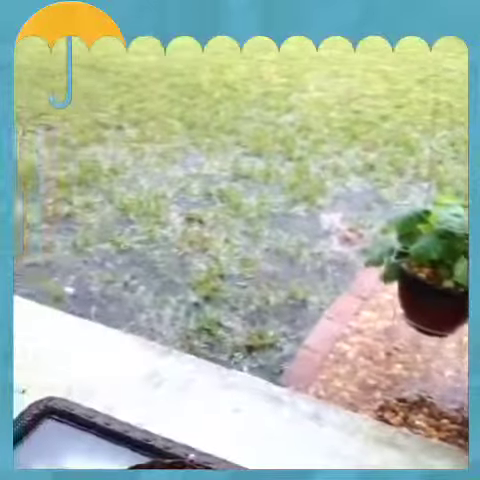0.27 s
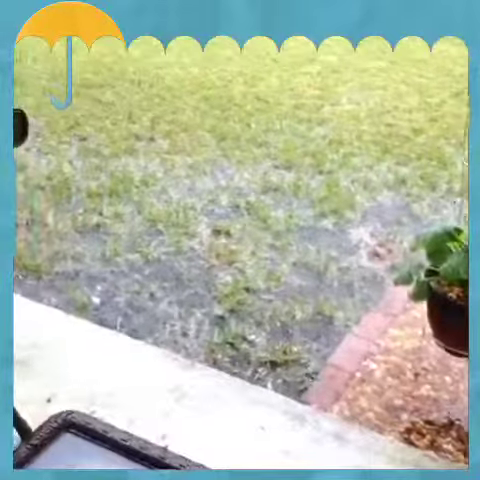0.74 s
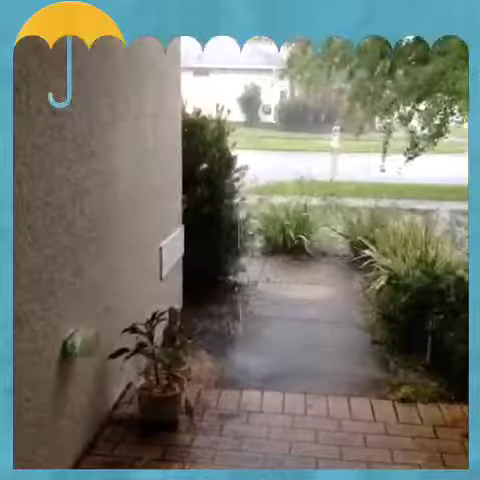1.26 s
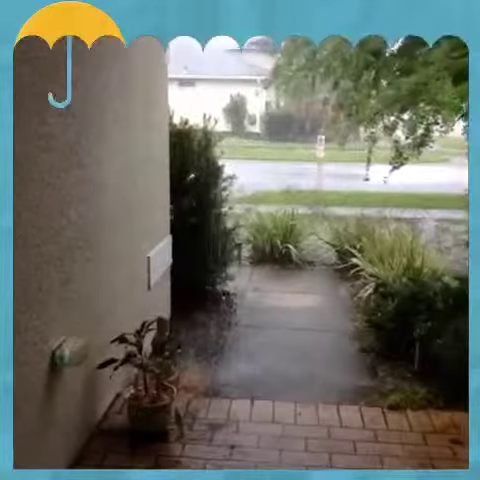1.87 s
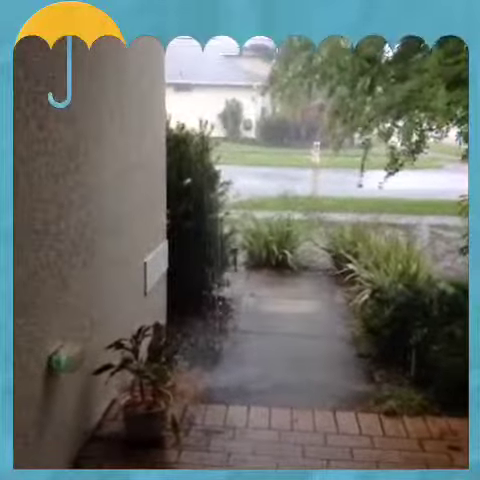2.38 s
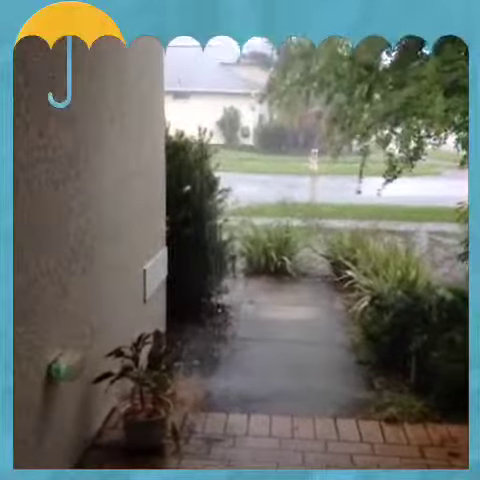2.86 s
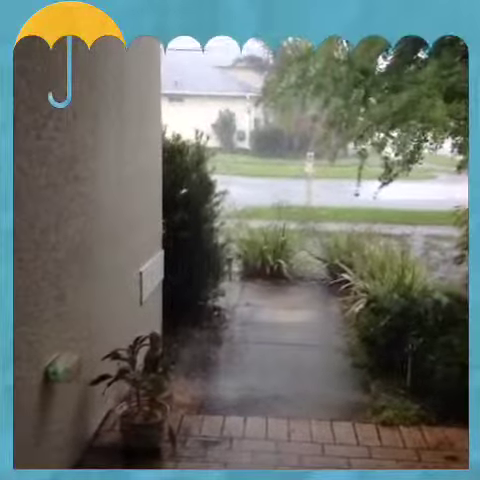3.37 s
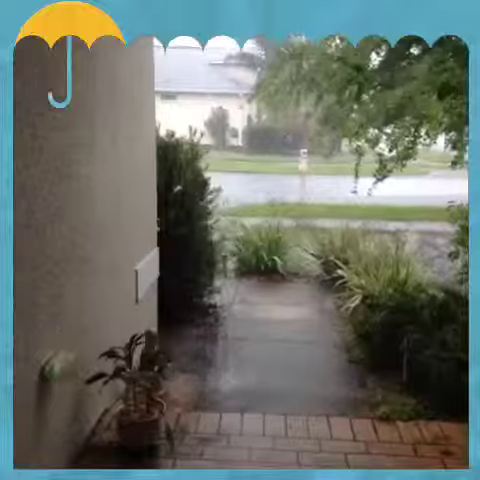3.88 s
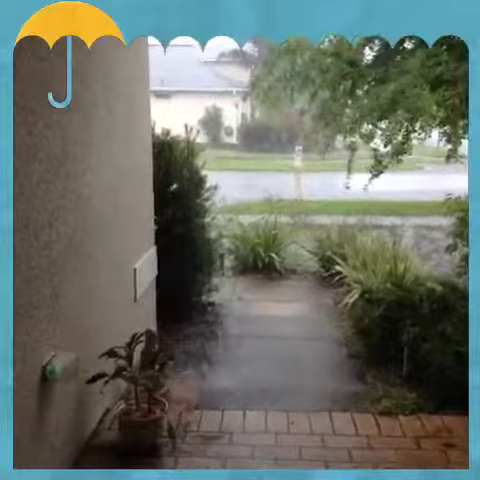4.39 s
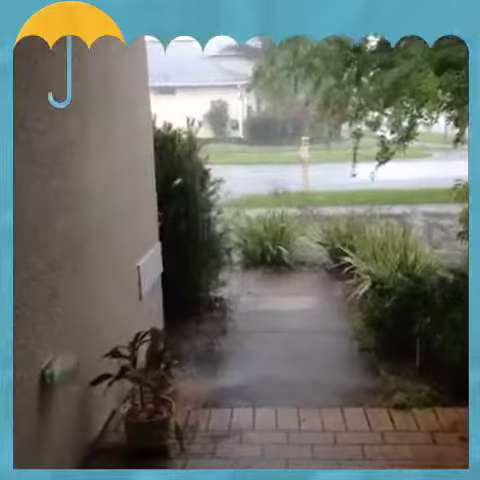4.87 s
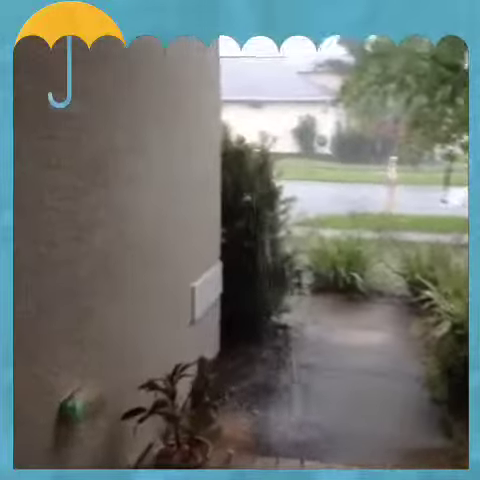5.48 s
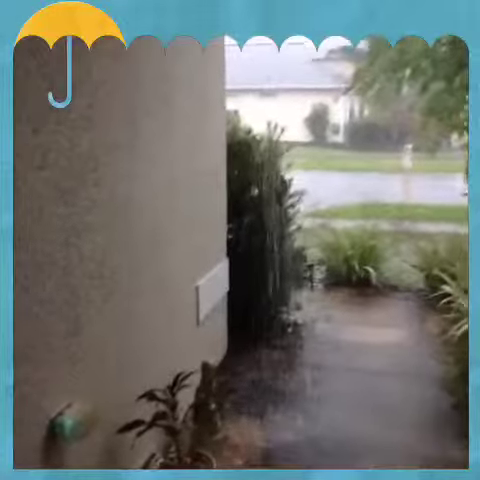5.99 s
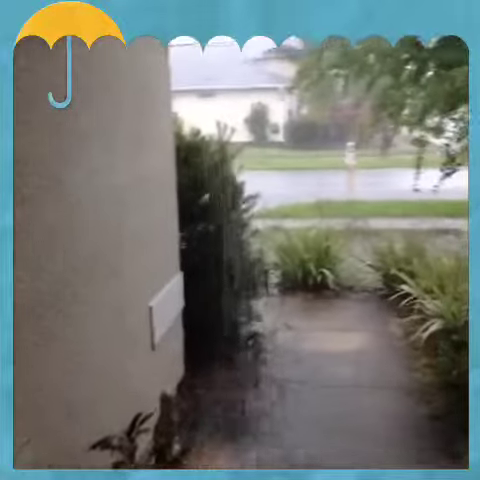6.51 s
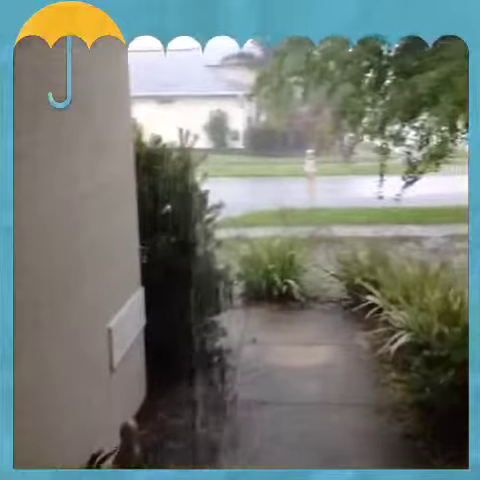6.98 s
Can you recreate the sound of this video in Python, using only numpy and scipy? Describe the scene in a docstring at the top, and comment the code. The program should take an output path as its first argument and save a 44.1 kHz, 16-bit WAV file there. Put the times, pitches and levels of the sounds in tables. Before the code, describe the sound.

From 0 to about 1 second, heavy rain falls on a flooded lawn: a steady, soft noise roar from wide grass, with fine bright random ticks and tiny rising bubble tones from nearby puddles. At 1.0 second it cuts abruptly to a front porch, louder and closer. Until the end just past 7 seconds, water pours from the roof edge onto wet paving in a dense, ragged, crackling spatter. Irregular splashes burst several times a second, some bright and hissy, others lower and slappy, each fading quickly, among bubbles and rounder plops. The runoff swells gently around 4 seconds, eases near 5, lifts slightly, eases again around 6.5, then strengthens at the end. Behind it, a quiet wash of street and garden rain grows very slightly, with a faint low, hollow hum of porch air. The walls give a short, faint echo. Sound is centred, identical in both channels.

```python
"""Heavy rain, lawn then porch

Rain over a flooded lawn cuts abruptly to rain heard from inside the front porch, the same in both channels.
The lawn is a noise roar with fine random ticks and small rising bubble tones.
At the porch, a noise wash and a resonant hum lie behind roof water: spattering drops, bubbles and plops,
and splashes made of droplet swarms. A short noise-tail echo answers the roof water."""
import sys
import numpy as np
from scipy import signal
from scipy.fft import rfft, irfft, next_fast_len
from scipy.io import wavfile
from scipy.ndimage import uniform_filter1d, map_coordinates

SR = 44100
rng = np.random.default_rng(int(sys.argv[2]) if len(sys.argv) > 2 else 0)


def persist_wave(psi):
    """Save psi, clipped to +-1, as 16-bit WAV."""
    counts = np.round(np.clip(psi, -1, 1) * 32767).astype(np.int16)
    wavfile.write(sys.argv[1], SR, np.atleast_2d(counts).T)


N = 319725

# The biggest gouts of roof water bursting on the paving. Each row: start in seconds,
# level of the swarm before its envelope in dB, pitch in Hz, pouring time in seconds.
BIG_SPLASHES = [(1.0, -32, 1300, .04), (1.055, -27, 5000, .03), (1.425, -32, 1900, .02),
                (1.433, -22, 4700, .025), (1.545, -27, 4000, 0.072), (1.665, -41, 430, 0.047),
                (1.8, -25, 7800, 0.037), (2.065, -24.5, 8500, .03), (2.125, -32.5, 1600, .02),
                (2.475, -23.5, 8000, .04), (2.482, -29, 1750, 0.031), (2.625, -24, 4400, .04),
                (2.67, -36, 950, .025), (2.925, -25, 6800, 0.07), (3.055, -24, 3500, .05),
                (3.443, -26, 3800, 0.013), (3.578, -23, 4600, 0.07), (3.68, -25, 3300, 0.045),
                (3.76, -32, 1700, 0.12), (3.895, -24.5, 2200, .06), (3.96, -26.5, 4600, .06),
                (4.12, -27, 9000, .04), (4.2, -24.5, 2900, 0.046), (4.372, -29, 1200, 0.018),
                (4.45, -25.5, 7000, 0.056), (4.485, -29, 2100, .02), (4.543, -24.5, 6800, .02),
                (4.665, -24.5, 9000, 0.037), (4.715, -26, 1900, .025), (4.777, -24, 2700, .025),
                (4.83, -24, 6800, 0.033), (5.032, -24, 2800, .012), (5.098, -22, 5800, 0.044),
                (5.155, -32.5, 1220, 0.041), (5.226, -21, 3900, .025), (5.318, -26, 10000, 0.025),
                (5.752, -27.5, 2200, 0.058), (5.793, -23.5, 8500, 0.022), (5.965, -23, 3800, .015),
                (6.055, -25.5, 4600, 0.048), (6.15, -39, 750, .04), (6.335, -29, 1900, .018),
                (6.47, -26.5, 3400, .03), (6.73, -30, 1060, 0.035), (6.81, -37.5, 620, 0.04),
                (6.843, -25.5, 1800, .025), (6.935, -32, 1200, 0.015), (6.98, -27.5, 4800, 0.082),
                (7.155, -26, 4500, 0.036)]
# Tone of the far grass roar. Each row: frequency in Hz, relative level in dB.
GRASS_SPECTRUM = [(25, -34), (60, -34), (105, -7), (200, -1), (310, 2), (450, -1.5), (1200, 2), (2300, -3),
                  (4000, -5.5), (9000, -15), (15000, -17)]
# Tone of the ticks on flooded lawn. Each row: frequency in Hz, relative level in dB.
PUDDLE_SPECTRUM = [(50, -60), (200, -30), (1200, -27), (3000, -4.5), (4750, 1.5), (5300, -4.5),
                   (6000, -0.5), (7800, 1), (10500, -3.5), (15000, -4)]
# Tone of the wash from street and garden. Each row: frequency in Hz, relative level in dB.
STREET_SPECTRUM = [(25, -44), (70, -21.5), (110, -10), (200, -6.5), (450, -2), (900, 3), (1500, -1),
                   (3000, -9), (8000, -4.5), (15000, -18)]
# Tone of roof water on wet paving. Each row: frequency in Hz, relative level in dB.
RUNOFF_SPECTRUM = [(50, -80), (300, -22.5), (1000, -12.5), (1900, -6), (2700, -2.5), (4000, -.5),
                   (4800, 0.5), (5300, -2), (6300, 0), (8100, -0.5), (9800, -4.5), (12500, -6.5),
                   (15000, -8.5)]
# How the paving colours every splash. Each row: frequency in Hz, relative level in dB.
PAVING_SPECTRUM = [(50, -70), (250, -22), (500, -8.5), (1200, -9.5), (2700, -5.5), (4700, -4), (5300, -7),
                   (6500, -5), (8100, -5.5), (10000, -10), (15000, -18)]
# Air resonances of the porch. Each row: centre in Hz, width in Hz, relative level in dB.
PORCH_MODES = [(94, 9, -19), (148.3, 6.1, -1.5), (196, 9.8, 1), (218.6, 13, 2), (241, 17.7, 3),
               (297, 30, -1.5), (385.5, 20.5, -1.5), (412, 14, -9.5), (499.5, 7.5, -3.5)]
# Roof water swells and eases. Each row: time in seconds, reference level in dB.
ROOF_FLOW = [(1.1, -23.5), (3.2, -22.5), (4.1, -21.5), (4.9, -23), (5.6, -22), (6.55, -23.5), (7.2, -21.5)]

MOVE_S = 1.008  # the lawn gives way to the porch here
TOP_HZ = 15300  # nothing is heard from here up
# lawn ticks: centre level and random drift
LAWN_DB, LAWN_DRIFT_DB = -32.5, 0.5
# wash beyond the porch: level halfway through, and steady gain as the rain gets heavier
WASH_DB, WASH_GAIN_DB_PER_S = -40, 0.2
# lesser splashes: level at 1 kHz, tilt with pitch, scatter either way
LESSER_DB, LESSER_DB_PER_OCTAVE, LESSER_SCATTER_DB = -40.5, 4.5, 1.5
LESSER_LOW_HZ, LESSER_HIGH_HZ, LESSER_POUR_S = 750, 6500, 0.019
# time constants of a splash's build-up and of its dying away after the pour
ATTACK_S, RELEASE_S = 0.003, 0.033
# a splash's band widens by WIDENING octaves for each octave its pitch lies above CLEAR_HZ
CLEAR_HZ, WIDENING = 340, 0.44
# narrow core on a splash's own pitch, and mist over all pitches (per octave of band width)
CORE_DB, CORE_OCTAVES, MIST_DB = -3, 0.26, -14.5


def amp(db):
    """Decibels to gain."""
    return 10 ** (np.asarray(db) / 20)


def unit(x):
    """x at rms 1."""
    return x / np.sqrt(np.mean(x ** 2) + 1e-20)


def along(points, hz):
    """(Hz, value) points read on a log frequency axis."""
    f, v = np.transpose(points)
    return np.interp(np.log(hz + 1), np.log(f + 1), v)


def wobble(rate):
    """A smooth random curve, rate knots a second."""
    knots = rng.standard_normal(int(N * rate / SR) + 4)
    return map_coordinates(knots, [np.arange(N) * rate / SR])


def filtered(x, response):
    """x times a response of frequency."""
    size = next_fast_len(len(x) + SR // 10)
    spectrum = rfft(x, size) * response(np.fft.rfftfreq(size, 1 / SR))
    return irfft(spectrum, size)[:len(x)]


def coloured(x, spectrum):
    """x shaped by (Hz, dB) points, at rms 1."""
    return unit(filtered(x, lambda hz: amp(along(spectrum, hz))))


def patter(size, rate, spread_db):
    """Drop impacts: single-sample clicks at random instants, rate a second, log-normal in strength."""
    lands = rng.random(size) < rate / SR
    strength = amp(spread_db * np.clip(rng.standard_normal(size), -2, 2))
    return unit(lands * strength * rng.choice([-1, 1], size))


def patchy(x, depth_db, bin_count, frame_count):
    """Drops come in clumps: each region of pitch and time gets a gain of its own."""
    z = signal.stft(x, nperseg=256)[2]
    field = uniform_filter1d(rng.standard_normal(z.shape), bin_count, 0)
    field = uniform_filter1d(field, frame_count, 1)
    return signal.istft(z * amp(depth_db * unit(field)), nperseg=256)[1][:N]


def plinks(count, low_hz, high_hz, cycles, spread_db):
    """Drops in standing water: brief damped tones that rise at first as their bubbles near the surface."""
    when, pitch, strength = rng.random((count, 3)).T[:, :, None]
    n = np.arange(SR // 25)
    turns = low_hz * (high_hz / low_hz) ** pitch * n / SR
    age = turns / cycles  # in decay times
    phase = 2 * np.pi * turns * (1 + 0.021 * np.minimum(age, 2))
    ring = (1 - np.exp(-turns)) * np.exp(-age) * np.sin(phase)
    places = (when * N).astype(int) + n
    tones = np.bincount(places.ravel(), (amp(spread_db * strength) * ring).ravel(), N)[:N]
    # clear out the rumble below the lowest bubble
    return unit(filtered(tones, lambda hz: hz ** 4 / (hz ** 4 + (low_hz / 2) ** 4)))


def lawn():
    """A soft noise roar from the wide grass, with fine ticks and bubbles from the flooded patch close by."""
    level_db = LAWN_DB + LAWN_DRIFT_DB * wobble(15.8)
    roar = amp(-34) * coloured(rng.standard_normal(N), GRASS_SPECTRUM)
    far_drops = patter(N, rate=18000, spread_db=0.5)
    near_drops = amp(-9) * patter(N, rate=130, spread_db=2)
    ticks = amp(level_db) * coloured(far_drops + near_drops, PUDDLE_SPECTRUM)
    bubbles = amp(level_db - 12) * plinks(count=3000, low_hz=1500, high_hz=7000, cycles=3.6, spread_db=10)
    return roar + ticks + bubbles


def distant_rain(level_db):
    """The wash from street and garden: noise with faintly uneven patches of pitch and time."""
    noise = patchy(rng.standard_normal(N), depth_db=0.5, bin_count=3, frame_count=16)
    return amp(level_db) * coloured(noise, STREET_SPECTRUM)


def porch_hum():
    """The air of the porch rings: noise through a bank of resonances."""
    def modes(f):
        total = 0
        for k, (centre, width, db) in enumerate(PORCH_MODES):
            resonance = 1j * f * width / (centre ** 2 - f ** 2 + 1j * f * width)
            total = total + amp(db) * resonance * (-1) ** k  # neighbours in opposite polarity
        return total * f ** 2 / (f ** 2 + 80 ** 2)  # thin out the lows

    return amp(-47) * unit(filtered(rng.standard_normal(N), modes))


def porch_echo(x, t60, wet_db):
    """Stucco walls and roof give a short, dense answer: a fresh decaying noise tail each quarter second."""
    t = np.arange(SR // 4) / SR
    wet = np.zeros(N + SR)
    for start in range(0, N, len(t)):
        tail = rng.standard_normal(len(t)) * amp(-60 * t / t60)
        answer = signal.fftconvolve(x[start:start + len(t)], tail / np.linalg.norm(tail))
        wet[start:start + len(answer)] += answer
    return x + amp(wet_db) * wet[:N]


def runoff(flow_db):
    """A ragged curtain of drops from the eaves spatters on wet paving; fat drops plop into the puddles."""
    drops = patchy(patter(N, rate=16000, spread_db=3.5), depth_db=1.23, bin_count=12, frame_count=10)
    spatter_db = flow_db - 0.5 + 0.41 * wobble(13)
    spatter = amp(spatter_db) * coloured(drops, RUNOFF_SPECTRUM)
    bubbles = amp(flow_db - 17) * plinks(count=2200, low_hz=1850, high_hz=6140, cycles=3.8, spread_db=27)
    fat_drops = plinks(count=520, low_hz=802, high_hz=3207, cycles=15.5, spread_db=7)
    plops = amp(flow_db - 19.5) * coloured(fat_drops, RUNOFF_SPECTRUM)
    return spatter + bubbles + plops


def lesser_splashes(count):
    """Small gouts, one at random in each equal slice of time, as rows like those of BIG_SPLASHES."""
    when, height, strength = rng.random((count, 3)).T
    start_s = (np.arange(count) + when) / count * N / SR
    hz = LESSER_LOW_HZ * (LESSER_HIGH_HZ / LESSER_LOW_HZ) ** height
    db = LESSER_DB + LESSER_DB_PER_OCTAVE * np.log2(hz / 1000)
    db = db + LESSER_SCATTER_DB * (2 * strength - 1)
    return list(zip(start_s, db, hz, np.full(count, LESSER_POUR_S)))


def splashes(gouts):
    """Each gout is a swarm of droplets that holds, then fades; the higher its pitch, the wider its band."""
    out, t = np.zeros(N + SR), np.arange(SR // 4) / SR
    for start_s, db, pitch_hz, pour_s in gouts:
        build_up = 1 - np.exp(-t / ATTACK_S)
        dying_away = np.exp(-np.maximum(t - pour_s, 0) / RELEASE_S)
        octaves = WIDENING * max(np.log2(pitch_hz / CLEAR_HZ), 0.1)

        def colour(hz):
            distance = np.log2((hz + 1) / pitch_hz)  # octaves from the splash's pitch
            spray = np.exp(-0.5 * (distance / octaves) ** 2)
            core = amp(CORE_DB) * np.exp(-0.5 * (distance / CORE_OCTAVES) ** 2)
            mist = amp(MIST_DB) * octaves
            return amp(along(PAVING_SPECTRUM, hz)) * (spray + core + mist)

        swarm = unit(filtered(patter(len(t), rate=4000, spread_db=2.5), colour))
        out[round(start_s * SR):][:len(t)] += amp(db) * swarm * build_up * dying_away
    return out[:N]


def scene():
    """The lawn, then the porch, the same in both channels."""
    t = np.arange(N) / SR
    flow_s, flow_level_db = np.transpose(ROOF_FLOW)
    flow_db = np.interp(t, flow_s, flow_level_db)
    wash_db = WASH_DB + WASH_GAIN_DB_PER_S * (t - N / 2 / SR)
    roof_water = runoff(flow_db) + splashes([*BIG_SPLASHES, *lesser_splashes(count=50)])
    background = distant_rain(wash_db) + porch_hum()
    porch = background + porch_echo(roof_water, t60=0.19, wet_db=-13)
    rain = np.where(np.arange(N) < MOVE_S * SR, lawn(), porch)
    return np.array([rain, rain])


def record(dry):
    """A steep low-pass: the treble stops at TOP_HZ."""
    return np.array([filtered(channel, lambda hz: hz < TOP_HZ) for channel in dry])


dry = scene()
out = record(dry)
persist_wave(out)
```